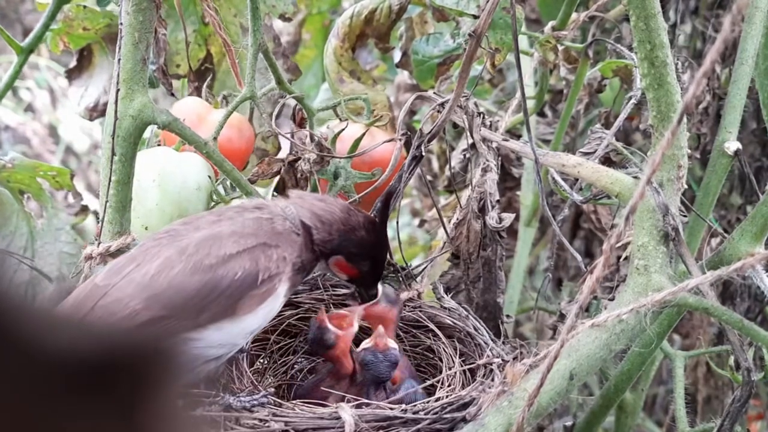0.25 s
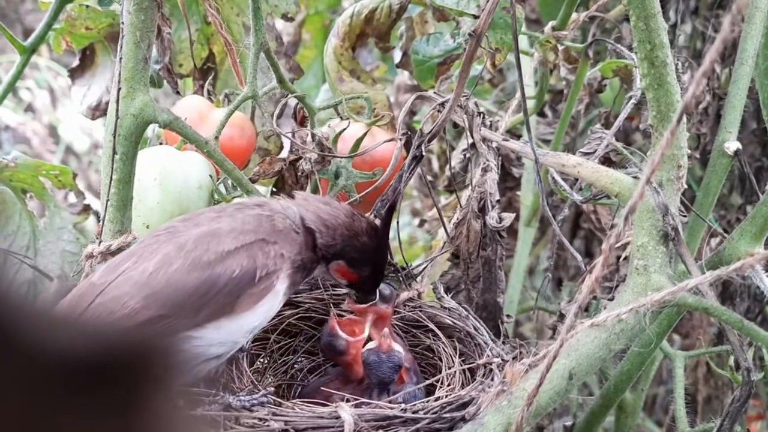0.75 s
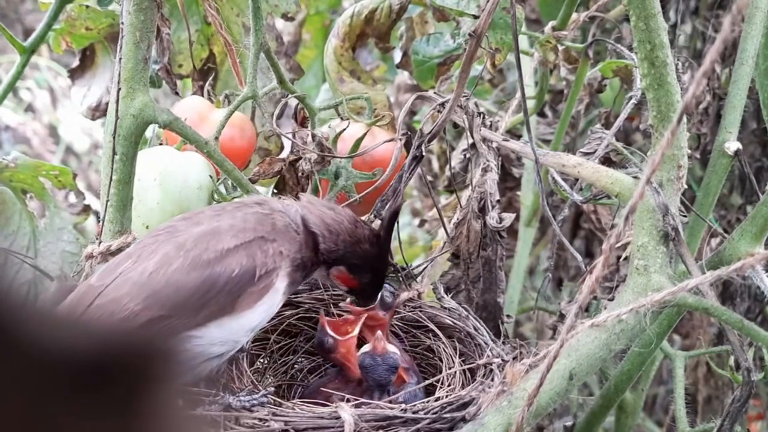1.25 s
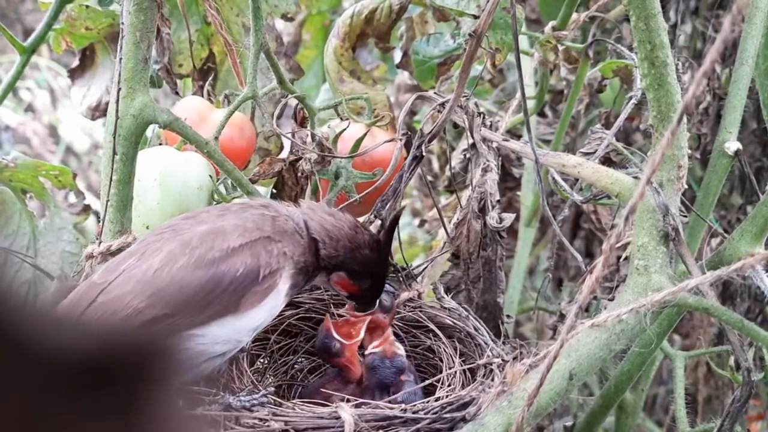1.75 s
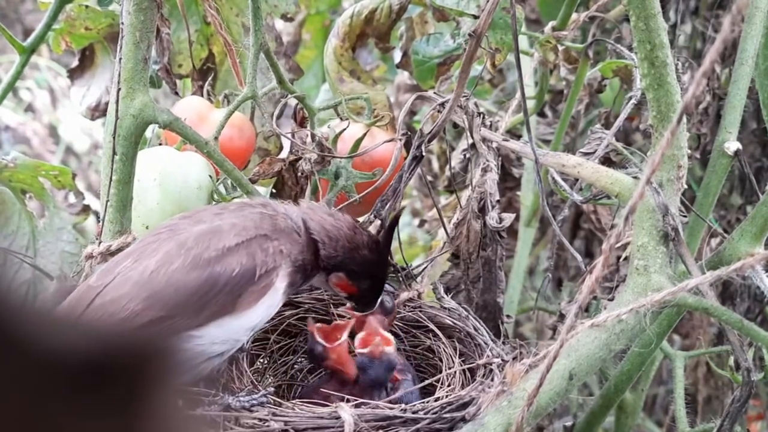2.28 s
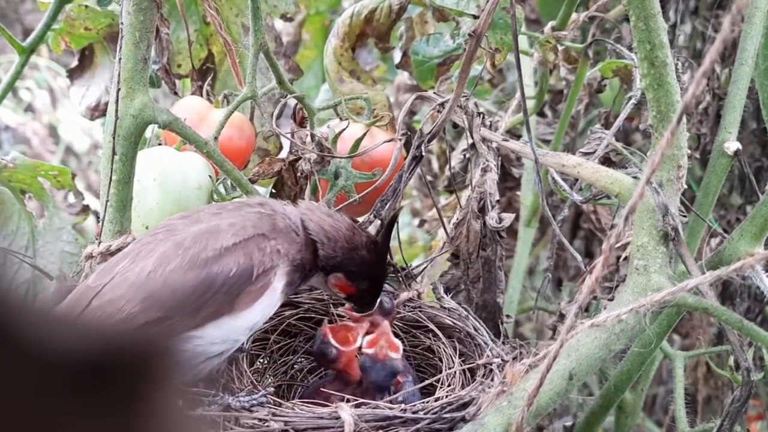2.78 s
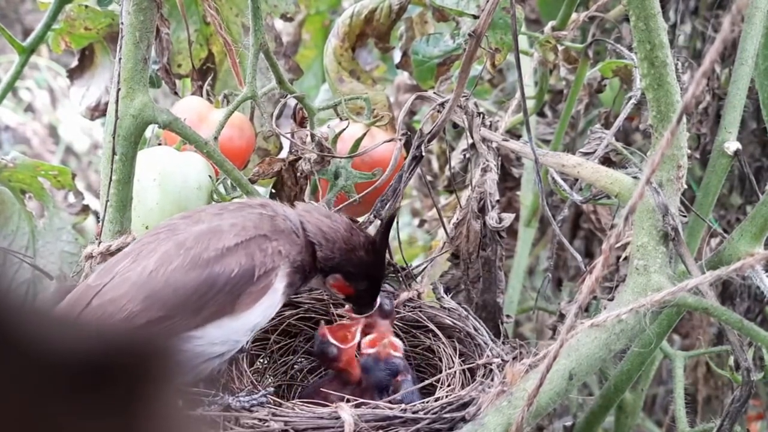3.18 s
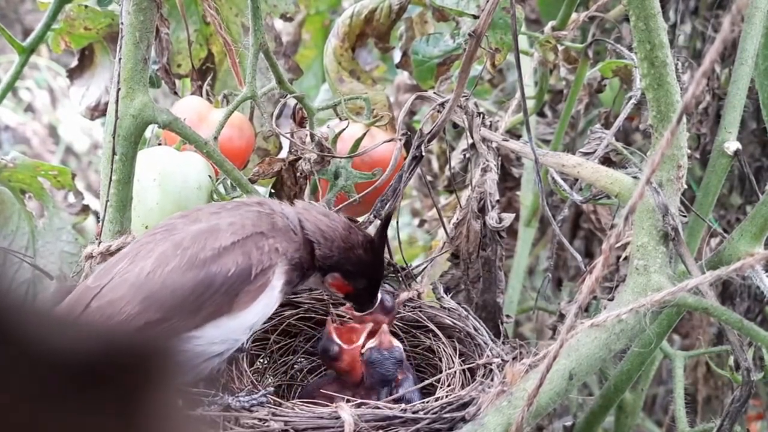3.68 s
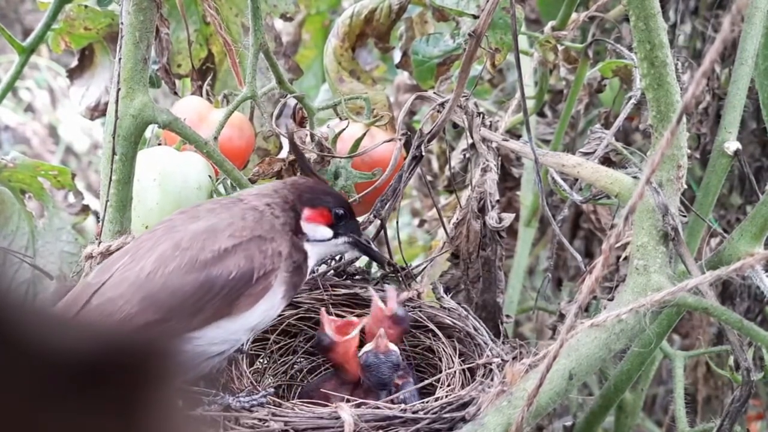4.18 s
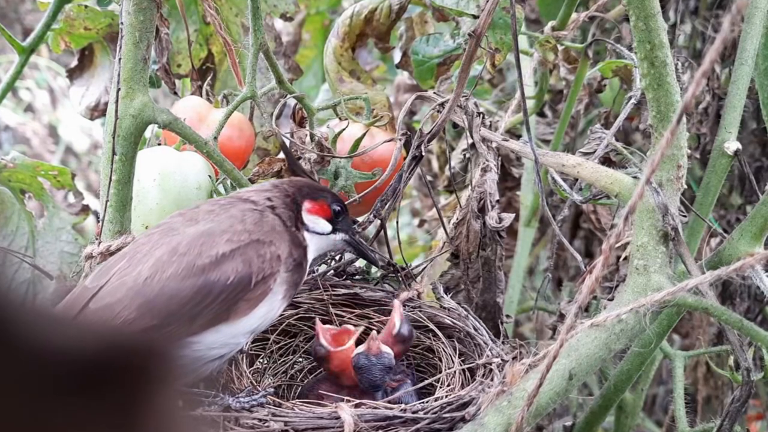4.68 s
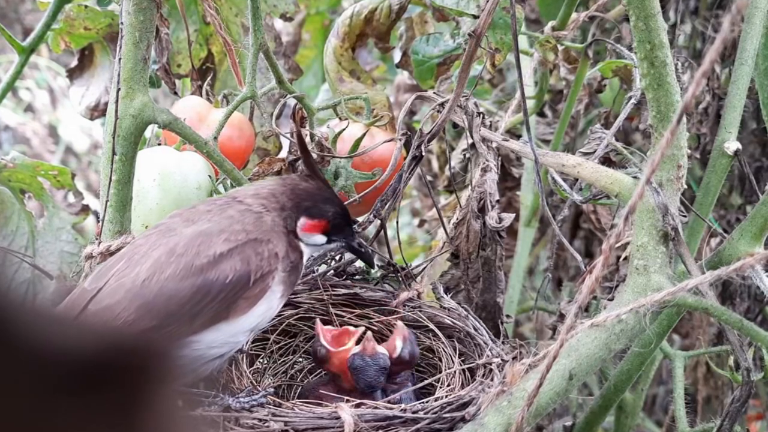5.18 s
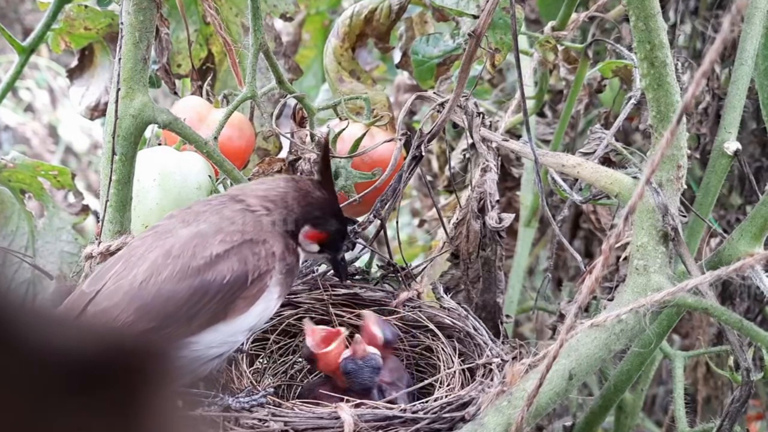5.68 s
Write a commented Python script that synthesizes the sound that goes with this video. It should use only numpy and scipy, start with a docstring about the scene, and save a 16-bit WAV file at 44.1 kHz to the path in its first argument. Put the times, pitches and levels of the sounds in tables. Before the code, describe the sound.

Thin high nestling-like cheeps, a brief rasping chatter and a steady cooing call over faint outdoor rumble, with a single low bump near the microphone.

```python
"""A vegetable garden: small birds chirp around a nest, each note a sine arching over a top pitch.
One breaks into a rasping chatter, two shaking voices cut into ragged pulses.
Further off a bird repeats a low two-part hoot, a nearly pure tone; leaves scatter every call.
One dull thump, a few sagging low cycles, sounds close to the microphone.
Behind it all lie a distant low rumble and a faint hiss, both shaped noise."""
import sys
import numpy as np
from scipy import signal
from scipy.fft import rfft, irfft
from scipy.io import wavfile
from scipy.ndimage import uniform_filter1d

SR = 44100
rng = np.random.default_rng(int(sys.argv[2]) if len(sys.argv) > 2 else 0)


def unload_audio(sound):
    """Save the sound as a 16-bit wav file, at the path given as the first command line argument."""
    columns = np.transpose(np.atleast_2d(sound))
    # keep every value between -1 and 1, then stretch to whole-number steps
    steps = np.round(np.clip(columns, -1, 1) * 32767)
    wavfile.write(sys.argv[1], SR, steps.astype(np.int16))


N = 261954
TIME = np.arange(N) / SR  # s


def from_db(db):
    """Decibels to gain."""
    return 10 ** (np.asarray(db) / 20)


def rms_one(x):
    """Scale to unit rms."""
    return x / np.sqrt(np.mean(x ** 2) + 1e-20)


def at_hz(points, hz):
    """Read a curve over frequency on a log-frequency axis."""
    curve = np.array(points)
    return np.interp(np.log(hz), np.log(curve[:, 0]), curve[:, 1])


def drift(rate, size=N):
    """Smooth random wander of spread 1, through `rate` random points a second."""
    knots = rng.standard_normal(size)
    wander = np.interp(np.arange(size) * min(rate / SR, 1), np.arange(size), knots)
    return wander / np.sqrt(2 / 3)  # straight lines between the points lose a third of the power


def tone(hz):
    """A sine of rms 1 on a moving pitch."""
    return np.sqrt(2) * np.sin(2 * np.pi * np.cumsum(hz) / SR)


def bell(centre, width):
    """A smooth rise and fall of height 1, down to 1/e one width from its centre."""
    return np.exp(-np.minimum(((TIME - centre) / width) ** 2, 50))


def arch(u, first, top, last, place, bend):
    """Pitch over a note (u from 0 to 1): up to the top, then down."""
    rise = top + (first - top) * np.abs(1 - u / place) ** bend
    fall = top + (last - top) * np.abs((u - place) / (1 - place)) ** bend
    return np.where(u < place, rise, fall)


def delayed(x, s):
    """The sound s seconds later."""
    return np.interp(TIME - s, TIME, x, left=0, right=0)


def placed(x, pan_db, left_lag_s):
    """A source as two spaced microphones pick it up: by level and by arrival time."""
    left = delayed(x, left_lag_s) * from_db(pan_db / 2)
    right = x * from_db(-pan_db / 2)
    return np.array([left, right])


def foliage(x, t60):
    """Countless small reflections off leaves and stems, different at each microphone."""
    t = TIME[:SR]
    build_up = 1 - np.exp(-t / 0.0096)
    tail = rng.standard_normal((2, SR)) * from_db(-60 * t / t60) * build_up
    tail /= np.sqrt(np.sum(tail ** 2, axis=1, keepdims=True))
    return signal.fftconvolve(np.atleast_2d(x), tail, axes=1)[:, :N]


# left-right likeness of the noise: (f/Hz, likeness 0-1)
LEFT_RIGHT_LIKENESS = [(40, 0.92), (90, 0.86), (200, 0.46), (400, 0.13), (800, 0), (15000, 0.025)]


def coloured_noise(spectrum):
    """Stereo noise of rms 1, alike in both channels only in the bass."""
    hz = np.maximum(np.arange(N // 2 + 1) * SR / N, 1)
    mid, side = rfft(rng.standard_normal((2, N))) * from_db(at_hz(spectrum, hz))
    alike = np.clip(at_hz(LEFT_RIGHT_LIKENESS, hz), -1, 1)
    stereo = np.sqrt(1 + alike) * mid + np.sqrt(1 - alike) * side * [[1], [-1]]
    return rms_one(irfft(stereo, N))


# colour of the rumble and of the hiss: (f/Hz, relative level/dB per Hz)
RUMBLE_SPECTRUM = [(16, -41), (28, -24.5), (52, -6.5), (75, -2), (136, -12.5), (155, -13), (172, -18),
                   (199, -16), (303, -22), (435, -25), (518, -28), (591, -30), (900, -35.5), (1170, -72),
                   (1980, -120)]
HISS_SPECTRUM = [(350, -23), (600, -6), (969, -6), (1220, -6.5), (1770, -8.5), (2230, -10), (3460, -13.5),
                 (3750, -14.5), (4080, -13), (5580, -18), (10100, -22), (15200, -12.5), (15800, -23.5)]
HISS_DB = -59.5
# slow swell of the rumble: (t/s, level/dB before wander and channel trim)
RUMBLE_SWELL = [(0, -47), (.7, -48.5), (1.1, -51), (1.75, -50), (2.1, -49), (2.35, -54.5), (2.8, -51),
                (3.3, -47.5), (4.1, -48.5), (4.5, -54), (5.25, -50), (5.9, -51)]
RUMBLE_WANDER_DB, RUMBLE_WANDER_PER_S = 2.0, 22
# brief surges of the rumble: (t/s of the peak, level/dB before channel trim)
RUMBLE_SURGES = [(.43, -43.5), (1.18, -44), (1.29, -40.5), (1.874, -40.5), (2.48, -44.5), (2.88, -43),
                 (3.2, -46), (3.59, -43), (3.94, -41.5), (4.28, -44.5), (4.695, -39.5), (5.64, -44)]
SURGE_WIDTH_S = 0.031


def background(steadiness=0.94):
    """Distant rumble that swells and sinks, a steady drone above it, and faint even hiss."""
    wander_db = RUMBLE_WANDER_DB * drift(RUMBLE_WANDER_PER_S)
    swell = from_db(np.interp(TIME, *np.transpose(RUMBLE_SWELL)) + wander_db)
    surges = sum(from_db(db) * bell(s, SURGE_WIDTH_S) for s, db in RUMBLE_SURGES)
    noise = coloured_noise(RUMBLE_SPECTRUM)
    deep = signal.sosfiltfilt(signal.butter(3, 150, fs=SR, output="sos"), noise)
    # level out the noise's own swells before the drawn ones are applied
    strength = np.sqrt(uniform_filter1d(np.mean(deep ** 2, axis=0), size=6000))
    level_deep = rms_one(deep / strength ** steadiness)
    rumble = level_deep * np.hypot(swell, surges) * from_db([[.7], [-.3]])
    drone = (noise - deep) * from_db([[-45.5], [-48]])
    return rumble + drone + from_db(HISS_DB) * coloured_noise(HISS_SPECTRUM)


# repeats of the hoot: (t/s, level/dB added to its notes)
HOOT_REPEATS = [(0.448, -1.1), (1.352, -1.2), (2.258, -2.5), (3.170, -3), (4.094, -3), (5.026, -4)]
# one long arch and a warble of three: (t/s from the hoot's start, length/s, start f/Hz, top f/Hz,
# end f/Hz, place of the top 0-1, level/dB before the repeat's gain, wave 0-1)
HOOT_PHRASE = [(0.019, 0.09, 989, 1184, 950, .64, -24.5, 0.04),
               (0.171, 0.0454, 1170, 1232, 1042, 0.32, -22, 0.97),
               (.203, .058, 1090, 1172, 1020, .3, -19, 1), (0.259, 0.0445, 1130, 1289, 1010, .37, -24.5, 1)]
# echoes of the hoot: (delay t/s, level/dB against the direct voice)
HOOT_ECHOES = [(.02, -21), (.057, -28.5), (.093, -19)]
HOOT_BEND = 2.58  # curvature of a plain arch; a wavy note levels off at its ends instead
HOOT_ATTACK, HOOT_RELEASE = 0.48, 0.14  # shares of a note's length
HOOT_FADE_DB_PER_HZ = 0.07  # the voice weakens as it falls below a note's top pitch


def hooting_bird():
    """One nearly pure phrase, repeated further off to the right, with echoes and a leafy tail."""
    voice, wander = np.zeros(N), drift(150)
    for start, gain_db in HOOT_REPEATS:
        for offset, length, first, top, last, place, level_db, wave in HOOT_PHRASE:
            span = (TIME >= start + offset) & (TIME < start + offset + length)
            u = (TIME[span] - start - offset) / length
            from_top = np.interp(u, [0, place, 1], [1, 0, 1])
            plain_sag = from_top ** HOOT_BEND
            wavy_sag = np.sin(np.pi / 2 * from_top) ** 2
            sag = (1 - wave) * plain_sag + wave * wavy_sag
            hz = top + (np.where(u < place, first, last) - top) * sag
            hz = hz * (1 + 0.0021 * wander[span])
            ramp = np.clip(np.minimum(u / HOOT_ATTACK, (1 - u) / HOOT_RELEASE), 0, 1)
            swell = np.sin(np.pi / 2 * ramp) ** 2
            note_db = level_db + gain_db - HOOT_FADE_DB_PER_HZ * (top - hz)
            voice[span] += swell * from_db(note_db) * tone(hz)
    echoes = sum(from_db(db) * delayed(voice, s) for s, db in HOOT_ECHOES)
    tail = from_db(-16.5) * foliage(voice, t60=.44)
    return placed(voice + echoes, pan_db=-3.0, left_lag_s=0.00032) + tail


# a light touch and then the full bump: (t/s, starting f/Hz, level/dB before panning)
THUMP_TOUCHES = [(1.527, 302, -43), (1.538, 240, -30)]
THUMP_ATTACK_S, THUMP_HOLD_S, THUMP_T60_S = 0.0063, 0.011, 0.046
THUMP_SAG_HZ_PER_S = 1060


def thump():
    """A short dull bump of a few low cycles close by; its pitch sags as it dies."""
    bump = np.zeros(N)
    for start, hz, level_db in THUMP_TOUCHES:
        age = np.maximum(TIME - start, 0)
        pitch = np.maximum(hz - THUMP_SAG_HZ_PER_S * age, hz / 2) * (age > 0)
        attack = np.minimum(age / THUMP_ATTACK_S, 1)
        dying = np.clip((age - THUMP_ATTACK_S - THUMP_HOLD_S) / THUMP_T60_S, 0, 10)
        bump += tone(pitch) * attack * from_db(level_db - 60 * dying)
    return placed(bump, pan_db=1.2, left_lag_s=0.0004) + from_db(-20) * foliage(bump, t60=0.16)


# chatter, about seven syllables a second: (t/s of the lower voice's peak, level/dB before the mix)
CHATTER_SYLLABLES = [(1.609, -54), (1.734, -49.5), (1.861, -46.5), (2.005, -48.5), (2.15, -48.5),
                     (2.281, -52.5)]
CHATTER_START_S, CHATTER_ATTACK_S = 1.514, 0.067
SYLLABLE_WIDTH_S = 0.051  # time over which the lower voice falls to 1/e of its peak
# the upper voice opens each syllable, longer and weaker
UPPER_LEAD_S, UPPER_WIDTH_S, UPPER_DB = .046, 0.057, -8


def rasping_bird(lower_hz=4380, upper_hz=5750, buzz_hz=105, buzz_depth=0.29, ragged_db=2.5, floor_hz=3750):
    """The two sides of the syrinx buzz at once in ragged pulses, each on a wildly shaking pitch."""
    lower_swell = sum(from_db(db) * bell(s, SYLLABLE_WIDTH_S) for s, db in CHATTER_SYLLABLES)
    upper_swell = sum(from_db(db + UPPER_DB) * bell(s - UPPER_LEAD_S, UPPER_WIDTH_S)
                      for s, db in CHATTER_SYLLABLES)
    opening = np.clip((TIME - CHATTER_START_S) / CHATTER_ATTACK_S, 0, 1)
    buzz = tone(buzz_hz * (1 + 0.2024 * drift(60))) / np.sqrt(2)  # peak 1
    pulses = rms_one((1 + buzz_depth * buzz) * from_db(ragged_db * drift(220)))
    # random shake and buzz both move the pitch, in Hz
    lower = lower_swell * tone(lower_hz + 210 * drift(900) + 130 * buzz)
    upper = upper_swell * tone(upper_hz + 375 * drift(1300) + 140 * buzz)
    thin_out = signal.butter(8, floor_hz, "high", fs=SR, output="sos")
    voice = signal.sosfilt(thin_out, (lower + upper) * opening * pulses)
    direct = from_db(-3.5) * placed(voice, pan_db=-7.5, left_lag_s=0.000373)
    scattered = from_db(2.5) * foliage(voice, t60=0.041)
    return (direct + scattered) * from_db([[-1], [1.5]])


# peeps that rise to a top and sag: (t/s, length/s, top f/Hz, place of the top 0-1, level/dB
# before flutter and fade, left over right/dB, scattered over direct/dB, rasp 0-1)
RISING_PEEPS = [ (0.31, 0.072, 5270, 0.43, -50, 10.5, -25, 0.3),
                (1.014, 0.063, 5110, 0.49, -43, 11, -20, 0), (1.321, 0.027, 4380, .8, -57, -16, 2, .75),
                (2.294, .082, 5800, 0.65, -52.5, -15, 0, 0.16),
                (2.366, 0.056, 5580, 0.67, -51, -16, -3, .14), (2.854, 0.051, 4770, 0.83, -62, -9, 0, .2),
                (2.94, .059, 6800, .58, -60, -11, -4, .2), (2.972, 0.07, 5940, 0.79, -48.5, -2, -12, 0.25),
                (3.074, 0.075, 5440, 0.58, -59.5, -22, -6, .1),
                (3.336, 0.0827, 4360, 0.34, -52, -7, -7.5, 0.1),
                (3.531, 0.085, 5650, 0.58, -51.5, -15, 2, .05), (3.677, 0.062, 5410, .5, -31, 12, -15, .05),
                (3.895, 0.032, 5210, 1, -63, -9, 2, .2), (4.166, 0.041, 4800, 0.75, -50.5, -10, -1.5, 0.3),
                (4.293, 0.043, 5210, 0.8, -56, -20, 8, .3), (4.339, 0.051, 5260, 1, -45, 0, -6, 0.17),
                (4.819, .11, 5500, .6, -66, -13, -5, .5), (5.054, .081, 5190, 0.38, -42.5, 12, -17, .34),
                (5.065, 0.07, 5593, 0.5, -52, -0.5, -5, 0.2), (5.655, 0.051, 4100, 0.66, -55, -14, 0, .6),
                (5.74, .081, 4930, 0.88, -45, -2.5, -11, 0.63)]
PEEP_START, PEEP_SAG = .82, 0.189  # start as a share of the top pitch; sag share, less for a late top
# whistles that slur downwards: (t/s, length/s, top f/Hz, end f/Hz, level/dB before flutter
# and fade, left over right/dB, rasp 0-1)
FALLING_SLURS = [ (0.461, .14, 3430, 3380, -66.5, 1, 0.3), (0.802, 0.12, 7380, 7050, -62.5, -17, 0.21),
                 (.86, 0.12, 3890, 3830, -58, -18, 0.42), (.865, 0.044, 2200, 1750, -56, 7, 0.83),
                 (1.078, 0.064, 2050, 1670, -59, 9, 0.4), (1.685, 0.053, 5200, 4600, -47.5, -1.5, 1),
                 (1.713, 0.054, 5290, 4900, -49, 6, 0.1), (2.494, 0.067, 4500, 4230, -61.5, -10, 1),
                 (2.585, .09, 5470, 4890, -62, -21, .2), (2.774, 0.039, 4900, 4580, -59, -7, .2),
                 (3.186, 0.058, 5300, 4180, -58, -17, .4), (3.464, 0.038, 5780, 3970, -59.5, -13, .6),
                 (3.668, .03, 4650, 4120, -51, -3, 0.5), (3.763, .025, 6440, 4740, -64, -8, 0.5),
                 (3.89, .032, 3030, 2860, -56, -2, 0), (3.912, 0.057, 2180, 2160, -65, 5, 0.1),
                 (4.054, .068, 4850, 3930, -48.5, -5, 0.14), (4.465, 0.074, 7200, 6230, -57, -3.5, 0.6),
                 (4.612, 0.12, 4640, 4280, -68, -12, .4), (4.683, .077, 2190, 2090, -62, 10, .74),
                 (4.85, 0.03, 2170, 2050, -63, 7, .5), (5.676, 0.14, 7370, 7080, -63.5, -18, .1),
                 (5.699, 0.026, 4600, 4200, -54.5, -16, .9)]
# start as a share of the top pitch; place of the top 0-1; scattered over direct/dB
SLUR_START, SLUR_TOP_PLACE, SLUR_SCATTER_DB = 1, 0.124, -4
# a hoarse down-up-down call from the right: (t/s from its start, length/s, start f/Hz, top f/Hz,
# end f/Hz, place of the top 0-1, level/dB added to the call's)
ZIGZAG_SWEEPS = [(0, 0.021, 5360, 5380, 3840, 0, -6), (0.025, .04, 3144, 5090, 5030, .95, -0.5),
                 (.067, .04, 4480, 4470, 2947, .03, 1)]
# repeats of that call: (t/s, level/dB before flutter and fade)
ZIGZAG_CALLS = [(1.15, -59), (4.52, -57.5), (4.919, -50.5), (5.329, -49), (5.744, -47.5)]
ZIGZAG_PAN_DB, ZIGZAG_SCATTER_DB, ZIGZAG_RASP = -15, -2, 0.66


def chirps():
    """Every small note: t, length, start, top and end Hz, top's place, dB, pan dB, scatter dB, rasp."""
    for start, length, top, place, level_db, pan_db, scatter_db, rasp in RISING_PEEPS:
        last = top * (1 - PEEP_SAG * (1 - place))
        yield start, length, top * PEEP_START, top, last, place, level_db, pan_db, scatter_db, rasp
    for start, length, top, last, level_db, pan_db, rasp in FALLING_SLURS:
        yield (start, length, top * SLUR_START, top, last, SLUR_TOP_PLACE,
               level_db, pan_db, SLUR_SCATTER_DB, rasp)
    for start, call_db in ZIGZAG_CALLS:
        for offset, length, first, top, last, place, level_db in ZIGZAG_SWEEPS:
            yield (start + offset, length, first, top, last, place,
                   call_db + level_db, ZIGZAG_PAN_DB, ZIGZAG_SCATTER_DB, ZIGZAG_RASP)


# octave overtone as picked up, boosted by the microphone's treble resonance:
# (f/Hz of the overtone, level/dB against the fundamental)
OVERTONE_AS_PICKED_UP = [(8000, -41), (10800, -34), (11500, -13.5), (14000, -22)]
CHIRP_FADE_DB_PER_HZ = 0.0056  # small birds too weaken below a note's top pitch


def chirping_birds(waver=0.0089, flutter_db=3.5, swell_power=0.5, swell_skew=0.81,
                   skew_per_place=0.22, rasp_spread=0.078, rasp_lift=1.04):
    """Each chirp is a whistle that arches over a top pitch; in hoarse ones the pitch shakes wildly."""
    direct, scattered = np.zeros((2, 2, N))
    wander, flutter, shake = drift(400), drift(170), drift(1300)
    for start, length, first, top, last, place, level_db, pan_db, scatter_db, rasp in chirps():
        span = (TIME >= start) & (TIME < start + length)
        u = (TIME[span] - start) / length
        place, rasp = np.clip(place, .02, .98), np.clip(rasp, 0, 1)
        bend = 1.277 + 4 * place * (1 - place)  # one-way sweeps are straighter than arches
        hz = arch(u, first, top, last, place, bend) * (1 + waver * wander[span])
        clear = tone(hz) + from_db(at_hz(OVERTONE_AS_PICKED_UP, 2 * hz)) * tone(2 * hz)
        hoarse = tone(hz * (rasp_lift + rasp_spread * shake[span]))
        voice = np.sqrt(1 - rasp ** 2) * clear + rasp * hoarse
        swell = np.abs(np.sin(np.pi * u ** (swell_skew + skew_per_place * place))) ** swell_power
        note_db = level_db + flutter_db * flutter[span] - CHIRP_FADE_DB_PER_HZ * (top - hz)
        # the note's power is shared between direct and scattered sound
        note = swell * from_db(note_db) * voice / np.hypot(1, from_db(scatter_db))
        sides = rms_one(from_db([[pan_db / 2], [-pan_db / 2]]))
        lead = 3.0 + 0.2 * pan_db  # samples by which the left microphone hears it first
        steps = np.arange(len(note))
        direct[:, span] += sides * [np.interp(steps + lead, steps, note), note]
        scattered[:, span] += np.sqrt(sides) * note * from_db(scatter_db)
    near = from_db(-2.5) * foliage(scattered, t60=0.12)
    far = from_db(-5) * foliage(scattered, t60=.33)
    return direct + near + far


def scene():
    """Everything in the garden."""
    return background() + hooting_bird() + thump() + rasping_bird() + chirping_birds()


def record(dry):
    """The top is cut steeply above 15.9 kHz."""
    return signal.sosfilt(signal.ellip(12, .1, 70, 15900, fs=SR, output="sos"), dry)


dry = scene()
out = record(dry)
unload_audio(out)
```